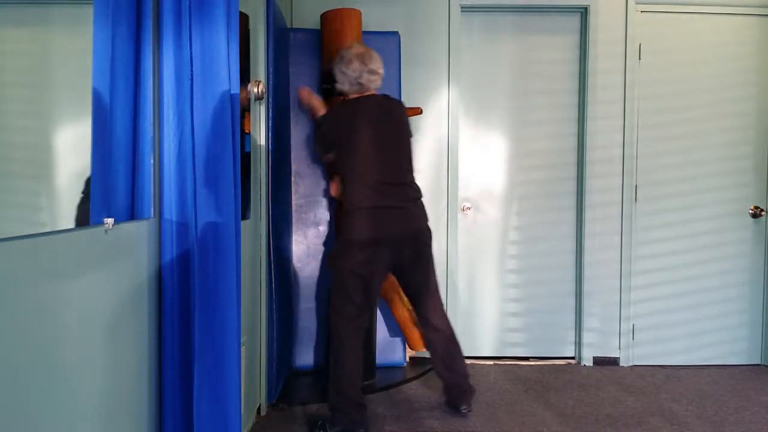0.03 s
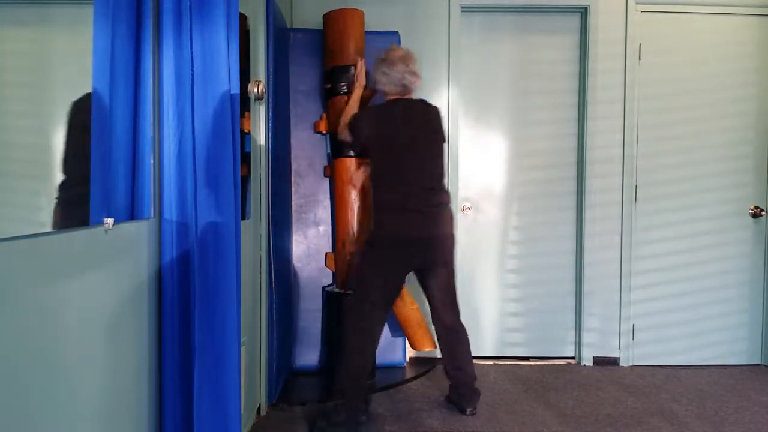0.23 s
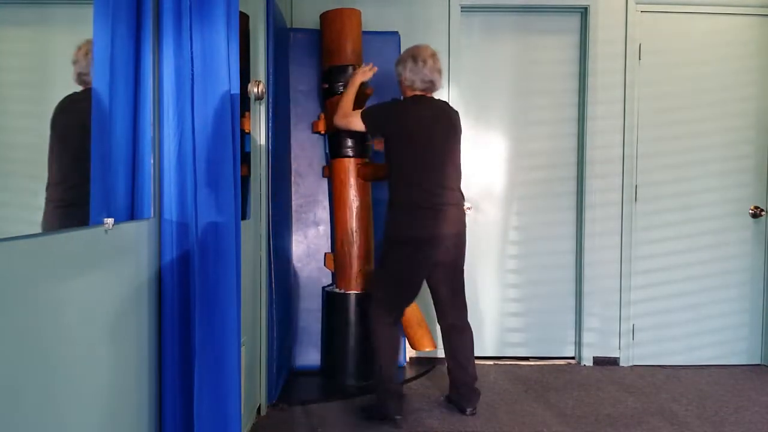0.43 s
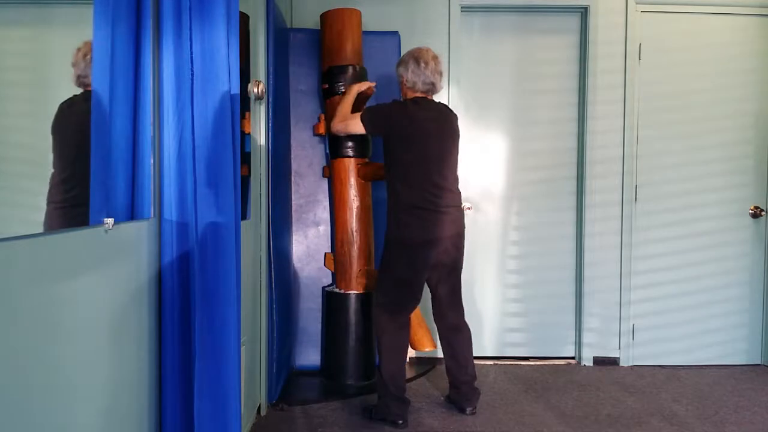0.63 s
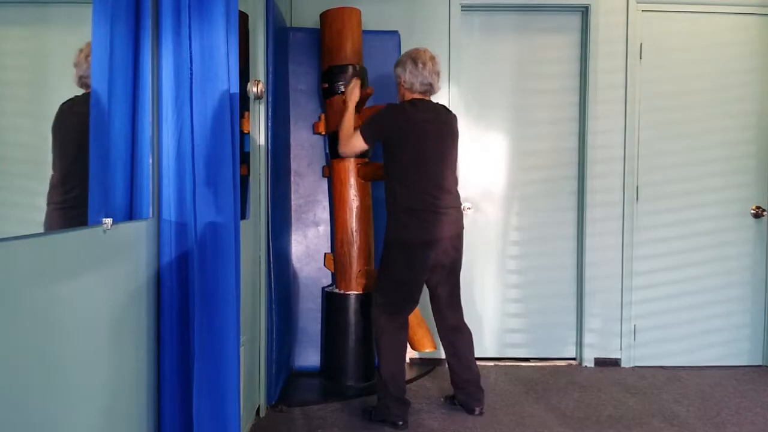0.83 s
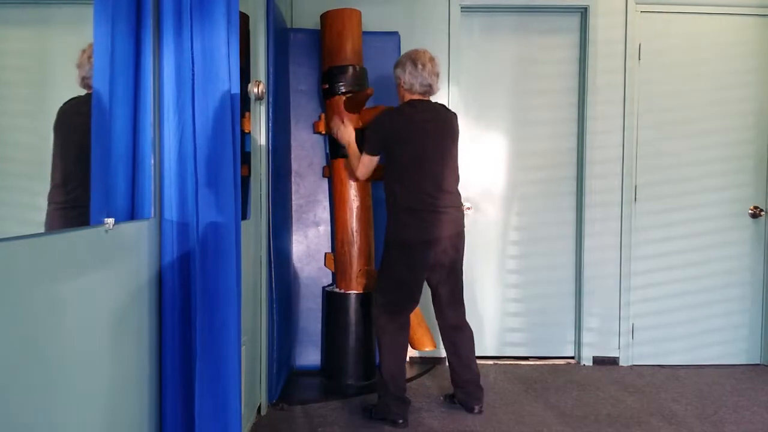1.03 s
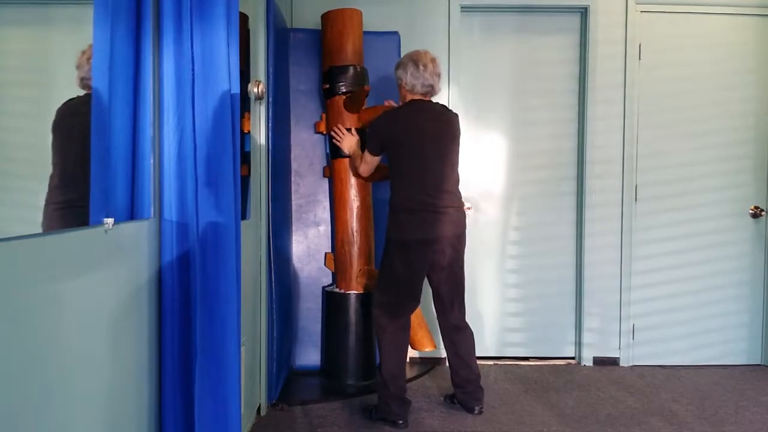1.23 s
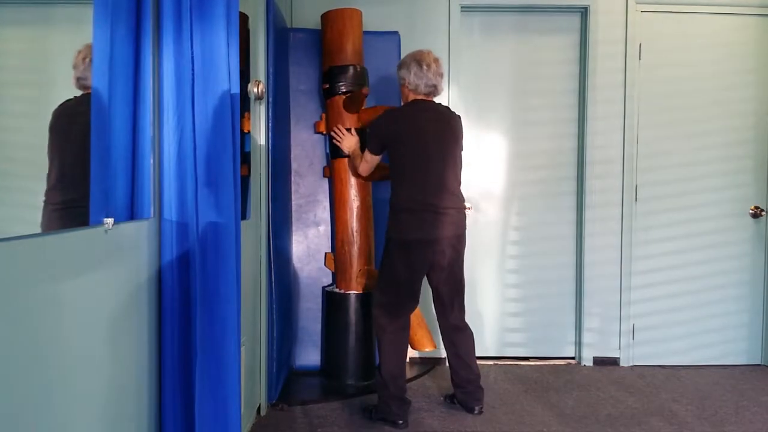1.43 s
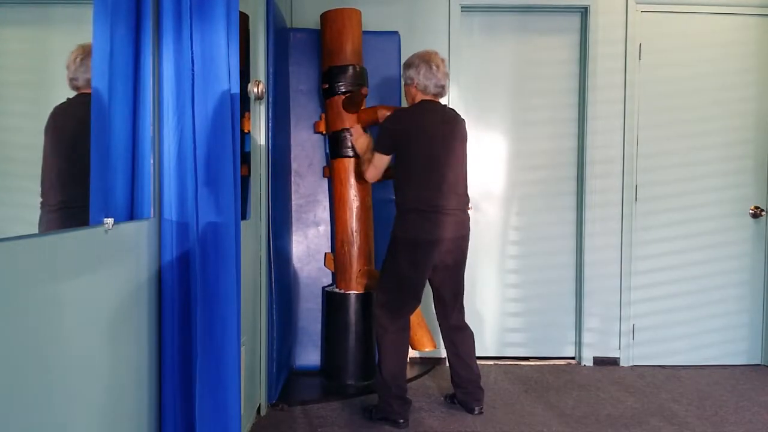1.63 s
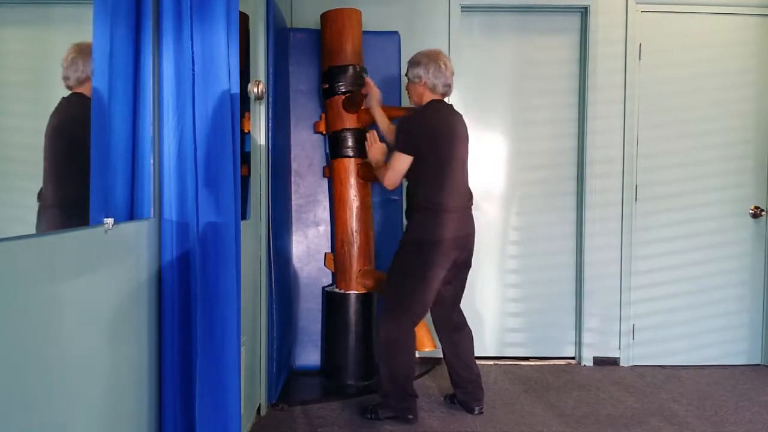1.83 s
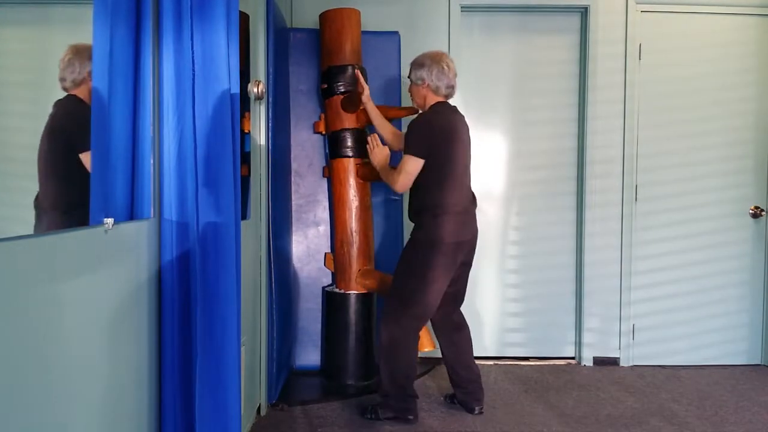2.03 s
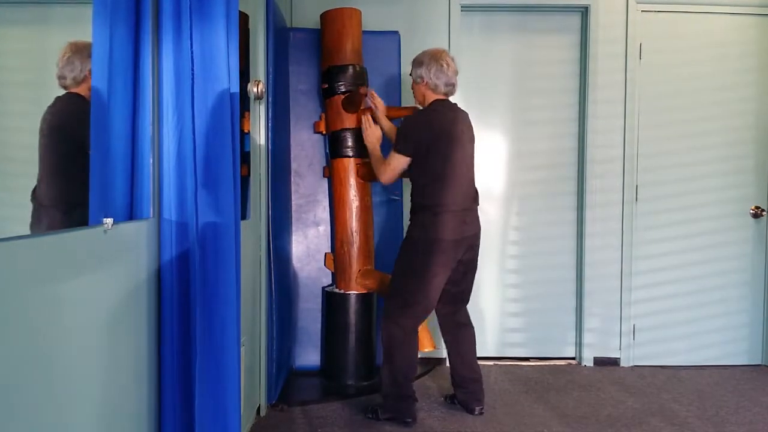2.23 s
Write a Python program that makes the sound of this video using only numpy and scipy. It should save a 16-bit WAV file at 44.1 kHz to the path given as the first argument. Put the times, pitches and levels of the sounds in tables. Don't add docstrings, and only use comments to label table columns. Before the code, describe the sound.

Wooden training dummy struck by bare arms in a reverberant room. Faint low rumble and hiss first; at 0.2 s a slap and rapid woody rattle with a step scuff. At 0.7 s a longer, clackier clatter; at 1.2 s the hardest slap and hollow ringing knocks. Faint cloth drag near 1.8 s, then a lighter slap and knocks at 1.96 s, fading. Distant microphone, muffled left side.

```python
import sys
import numpy as np
from scipy import signal
from scipy.fft import rfft, irfft, next_fast_len
from scipy.io import wavfile
from scipy.ndimage import uniform_filter1d

SR = 44100
rng = np.random.default_rng(int(sys.argv[2]) if len(sys.argv) > 2 else 0)


def digitize_waveform(pressure):
    field = np.atleast_2d(pressure).T
    bounded = np.clip(field, -1, 1)
    quanta = np.round(bounded * 32767).astype(np.int16)
    wavfile.write(sys.argv[1], SR, quanta)


def magnitude_from_level(level_db):
    exponent = np.asarray(level_db, float) / 20
    return 10 ** exponent


N = 101429

# (time [s], level [dB])
RUMBLE_COLOUR = [(15, -32), (25, -47), (48, -15), (115, -11), (288, -21), (359, -15), (494, -23.5),
                 (525, -28.5), (3000, -57), (3900, -93), (6600, -120)]
RUMBLE_SWELL = [(0, 16.5), (.8, 17.5), (1.599, 14.5), (2.3, 13)]
RUMBLE_DB = -65.5
# (frequency [Hz], density [dB per Hz]); then the (left [dB], right [dB]) levels
HISS_COLOUR = [(500, 14), (3000, 6.8), (9000, 0.46), (15000, 7.4)]
HISS_DB = [-67, -63.5]
# (time [s], level [dB], pitch [Hz])
TOUCHES = [
    (.203, -54, 589),
    (.211, -53, 600),
    (.231, -34, 560),
    (.704, -44, 486),
    (0.706, -47.5, 890),
    (.722, -40, 420),
    (1.179, -47.5, 330),
    (1.209, -28.5, 601),
]
TOUCH_PEAK_S = 0.0068
# (time [s], length [s], level [dB])
SHUFFLES = [
    (0.218, 0.059, -40.5),
    (0.373, 0.084, -53.5),
    (0.519, 0.039, -62.5),
    (0.695, 0.092, -43.5),
    (1.761, 0.19, -67.5),
]
# (frequency [Hz], density [dB per Hz])
SHUFFLE_COLOUR = [(300, 23.5), (1000, 8.5), (3000, 12.5), (8000, 3), (15000, -16.5)]
# (time [s], level [dB])
SLAPS = [
    (0.2234, -13.5),
    (0.2277, -19),
    (0.235, -25),
    (0.554, -31),
    (1.179, -8),
    (1.182, -15.5),
    (1.96, -28.5),
    (1.964, -15),
]
# (frequency [Hz], level [dB])
SLAP_COLOUR = [(100, -15), (500, -1.5), (1500, 1), (4000, 0.5), (8000, -4), (12900, -10.5), (16000, -16.5)]
# (time [s], thud level [dB], knock level [dB], bright clack level [dB])
KNOCKS = [
    [(.243, -19, -9.5, -19.5), (.2465, -24.5, -19, -15.5), (.255, -21.5, -23, -19.5),
     (.261, -22.5, -22, -32), (.267, -16, -15, -19), (.276, -32, -25.5, -24), (.292, -24.5, -27, -31),
     (.307, -26.5, -33.5, -24.5), (.44, -49, -31, -40), (.5, -52, -46, -54)],
    [(.731, -28, -21.5, -17.5), (.737, -19, -16, -18.5), (.743, -27.5, -16, -13.5), (.76, -18, -22.5, -22),
     (.785, -16, -21.5, -20.5), (.808, -38, -17.5, -31.5), (.822, -17, -24.5, -42), (.85, -22, -21, -31),
     (.875, -40, -45, -46.5), (.915, -42, -34, -36.5), (1.02, -33, -38.5, -48)],
    [(1.2145, -18, -20.5, -19), (1.225, -21, -11, -13.5), (1.238, -14, -18.5, -44.5)],
    [(1.246, -19.5, -13.5, -16.5), (1.262, -23, -15, -33), (1.28, -24.5, -24, -28),
     (1.3, -29.5, -29, -22.5), (1.342, -20, -36.5, -36.5), (1.396, -27, -25, -31)],
    [(1.965, -25, -23, -35.5), (1.973, -27, -25.5, -30), (1.998, -31.5, -40, -31)],
    [(2.004, -24, -20.5, -35.5), (2.02, -23.5, -22.5, -30), (2.029, -32.5, -27, -25.5),
     (2.075, -40, -34, -45), (2.105, -37.5, -37.5, -43), (2.2, -58, -40, -45.5)],
]
# (frequency [Hz], width [Hz], level [dB])
ARM_1_MODES = [(285, 26, -2.5), (546.3, 54, 5), (610, 46, -6), (820, 70, -6), (1486, 98, -11.5),
               (2057, 35, -16), (2290, 37, -27), (2540, 40, -45), (3420, 70, -32), (5380, 60, -23.5),
               (7400, 380, -42.5)]
ARM_2_MODES = [(263, 31, -12), (372, 160, -10), (833, 60, -6), (1100, 75, -21.5), (1781, 22, 4.5),
               (2405, 50, -22), (2578, 120, -16), (3670, 150, -22), (4414, 150, -19.5), (4960, 80, -22),
               (5690, 71, -8), (6120, 52, -11), (7500, 1300, -30.5)]
ARM_3_MODES = [(262, 41, -12), (440, 91, -3), (790, 85, 1.5), (1060, 41, -6), (1770, 52, 4.5),
               (2522, 44, -5.5), (3380, 90, -19), (4720, 80, -22.5), (5300, 90, -11), (5690, 250, -9),
               (6110, 68, -13.5)]
ARM_3_LATE_MODES = [(273, 30, -22), (420, 100, -5.5), (560, 70, 1), (814, 55, -5), (1090, 44, -7.5),
                    (1533, 38, 5.5), (1620, 50, 0.5), (2313, 100, -11), (2860, 74, -21), (3700, 61, -18.5),
                    (4310, 70, -19), (5460, 80, -10.5), (5550, 55, -16), (5980, 110, -15.5)]
ARM_4_EARLY_MODES = [(248, 24, -15), (455, 70, 4.5), (833, 69, -8), (1590, 95, 3), (2055, 120, -13.5),
                     (2390, 73, -9.5), (3380, 260, -22), (5300, 110, -18)]
ARM_4_MODES = [(274, 41, -15), (411, 46, 6.5), (560, 50, -2), (793, 57, -2), (1566, 23, 3),
               (1610, 20, -9.5), (2035, 100, -24), (2370, 73, -19), (3480, 570, -32.5), (5330, 68, -24.5)]
# (frequency [Hz], density [dB per Hz])
CRACK_1 = [(60, -31), (200, -39), (400, 4.5), (750, 17), (1300, -1), (2500, -36), (6000, -60), (16000, -79)]
CRACK_2 = [(60, -37.5), (200, 8.5), (900, 9.5), (1350, -8), (2500, -12.5), (6200, -13.5), (7000, -41),
           (16000, -21.5)]
CRACK_3 = [(60, -14.5), (200, -4.5), (900, 17), (1300, -10), (2500, -2), (6200, 3), (7000, -33.5),
           (16000, -47.5)]
CRACK_4 = [(60, -24.5), (200, 4), (800, 15), (1250, -4), (2500, -27.5), (6000, -31), (9000, -25.5),
           (16000, -54)]
CRACK_DB = [12, 17.7, 10.3, 9, 13.7, 10.6]
CRACK_DECAY_S, STRIKE_SPREAD_DB = 0.0023, 3
NARROWEST_HZ, HIGHEST_Q = 20, 80
THUD_TOP_HZ, CLACK_FROM_HZ, KNOCK_TOP_HZ = 380, 1250, 10000
# (frequency [Hz], level [dB])
KNOCK_COLOUR = [(540, 0.5), (680, -5.5), (790, 0.5), (1100, -1.5), (1400, 0.5)]
# (frequency [Hz], t60 [s])
ROOM_T60 = [(60, 0.18), (150, 1), (300, 0.68), (600, 0.46), (850, 0.41), (1500, 0.36), (4000, 0.4),
            (8000, 0.26), (14000, 0.43)]
# (frequency [Hz], likeness [0 to 1])
LIKENESS = [(90, 1.05), (180, 0.79), (550, 1), (1650, 0.31), (4970, 0.063), (15000, 0.02)]
DIRECT_DB, ROOM_DB, BUILD_S, SOURCE_LOW_HZ = 1, -25, 0.0008, 163
EARLY_DB, EARLY_S, EARLY_TOP_HZ = 13, 0.016, 1200
EVEN_HZ = 43.1
# (frequency [Hz], level [dB])
LEFT_PORT = [(60, -2.5), (250, -2.5), (600, -7.5), (1100, -15), (2500, -18), (5000, -20), (7000, -41.5),
             (15000, -50.5)]
PEAK_LIMIT, RECORDER_TOP_HZ = 1.1, 15900


def at_hz(points, hz):
    table = np.array(points)
    return np.interp(np.log(hz + 1), np.log(table[:, 0]), table[:, 1])


def rms_one(x):
    return x / np.sqrt(np.mean(x ** 2) + 1e-20)


def min_phase(x, db):
    size = 2 * len(db) - 2
    cepstrum = irfft(np.log(magnitude_from_level(db)), size)
    cepstrum[1:size // 2] *= 2
    cepstrum[size // 2 + 1:] = 0
    return irfft(rfft(x, size) * np.exp(rfft(cepstrum)), size)[..., :x.shape[-1]]


def colour(x, points):
    half = next_fast_len(x.shape[-1])
    hz = np.arange(half + 1) * SR / 2 / half
    return min_phase(x, at_hz(points, hz))


def pair(length, t60=None):
    out, t = 0, np.arange(length) / SR
    edges = 22 * 2 ** np.arange(0, 10, .5)
    white = rng.standard_normal((2, 2, length))
    for k, (low, high) in enumerate(zip(edges, edges[1:])):
        band = signal.butter(2, [low, high], "band", fs=SR, output="sos")
        mid, side = signal.sosfilt(band, white[k % 2])
        hz = np.sqrt(low * high)
        alike = np.clip(at_hz(LIKENESS, hz), 0, 1)
        fade = 1 if t60 is None else magnitude_from_level(-60 * t / at_hz(t60, hz))
        out = out + fade * (np.sqrt(1 + alike) * mid + np.sqrt(1 - alike) * side * [[1], [-1]])
    return out


def add(track, s, sound):
    i = int(s * SR)
    track[i:i + len(sound)] += sound[:len(track) - i]


def room_tone():
    s, db = np.transpose(RUMBLE_SWELL)
    level_db = RUMBLE_DB + np.interp(np.arange(N) / SR, s, db)
    rumble = colour(pair(N + SR), RUMBLE_COLOUR + [(6000, -74)])[:, SR:]
    return magnitude_from_level(level_db) * rms_one(rumble)


def preamp_hiss():
    hiss = rms_one(colour(rng.standard_normal((2, N)), HISS_COLOUR))
    return magnitude_from_level(np.array(HISS_DB))[:, None] * hiss


def touches():
    out, t = np.zeros(N), np.arange(2048) / SR
    bump = (t / TOUCH_PEAK_S) * np.exp(1 - t / TOUCH_PEAK_S)
    for s, db, hz in TOUCHES:
        add(out, s, magnitude_from_level(db) * bump * np.sin(2 * np.pi * hz * t))
    return out


def shuffles():
    t = np.arange(N) / SR
    swell = np.zeros(N)
    for s, length, db in SHUFFLES:
        swell += magnitude_from_level(db) * np.sin(np.pi * np.clip((t - s) / length, 0, 1))
    grain = rng.standard_normal(N) * magnitude_from_level(0.63 * rng.standard_normal(N))
    return swell * rms_one(colour(grain, SHUFFLE_COLOUR))


def crack(points):
    splinter = .15 * rng.standard_normal(4096) * np.exp(-np.arange(4096) / SR / CRACK_DECAY_S)
    splinter[0] = .7
    return colour(splinter, points)


def slaps():
    out = np.zeros(N)
    for s, db in SLAPS:
        add(out, s, magnitude_from_level(db) * crack(SLAP_COLOUR))
    return out


def knock(modes, crack_points, crack_db):
    t = np.arange(8192) / SR
    hz, width, db = np.transpose(modes)[:, :, None]
    width = np.maximum(width, np.maximum(NARROWEST_HZ, hz / HIGHEST_Q))
    gains = magnitude_from_level(db + STRIKE_SPREAD_DB * rng.standard_normal(hz.shape)) * width / 150
    body = np.sum(gains * np.exp(-np.pi * width * t) * np.sin(2 * np.pi * hz * t), axis=0)
    body[:4096] += magnitude_from_level(crack_db) * crack(crack_points)
    return body


def dummy():
    out = np.zeros(N)
    thud_band = signal.butter(2, THUD_TOP_HZ, "low", fs=SR, output="sos")
    knock_band = signal.butter(2, [THUD_TOP_HZ, CLACK_FROM_HZ], "band", fs=SR, output="sos")
    clack_band = signal.butter(2, CLACK_FROM_HZ, "high", fs=SR, output="sos")
    arms = (ARM_1_MODES, ARM_2_MODES, ARM_3_MODES, ARM_3_LATE_MODES, ARM_4_EARLY_MODES, ARM_4_MODES)
    cracks = (CRACK_1, CRACK_2, CRACK_3, CRACK_3, CRACK_4, CRACK_4)
    for contacts, modes, points, crack_db in zip(KNOCKS, arms, cracks, CRACK_DB):
        for s, thud_db, knock_db, clack_db in contacts:
            body = knock(modes, points, crack_db)
            thud = magnitude_from_level(thud_db) * signal.sosfilt(thud_band, body)
            middle = magnitude_from_level(knock_db) * signal.sosfilt(knock_band, body)
            clack = magnitude_from_level(clack_db + 9.5) * signal.sosfilt(clack_band, body)
            add(out, s, thud + middle + clack)
    knock_top = signal.butter(5, KNOCK_TOP_HZ, fs=SR, output="sos")
    return signal.sosfilt(knock_top, colour(out, KNOCK_COLOUR))


def room_answer():
    t = np.arange(SR) / SR
    tail = pair(SR, ROOM_T60) * (1 - np.exp(-t / BUILD_S))
    dull = signal.sosfilt(signal.butter(2, EARLY_TOP_HZ, fs=SR, output="sos"), tail)
    tail = tail + magnitude_from_level(EARLY_DB) * np.exp(-t / EARLY_S) * dull
    tail[:, 0] = magnitude_from_level(DIRECT_DB - ROOM_DB)
    power = np.abs(rfft(tail[1], 2 * SR)) ** 2 + 1e-9
    fine = uniform_filter1d(power, size=int(2 * EVEN_HZ))
    broad = uniform_filter1d(power, size=1000)
    return magnitude_from_level(ROOM_DB) * min_phase(tail, -10 * np.log10(fine / broad))


def room(x, answer):
    x = signal.sosfilt(signal.butter(2, SOURCE_LOW_HZ, "high", fs=SR, output="sos"), x)
    return signal.fftconvolve(x[None], answer)[:, :N]


def scene():
    answer = room_answer()
    rumble = room_tone()
    blows = touches() + shuffles() + slaps() + dummy()
    return room(blows, answer) + rumble


def roll_off(x):
    return signal.sosfilt(signal.butter(12, 16460, fs=SR, output="sos"), x)


def record(dry):
    x = np.array([colour(dry[0], LEFT_PORT), dry[1]])
    x = x + preamp_hiss()
    rounded = PEAK_LIMIT * np.tanh(x / PEAK_LIMIT)
    top_cut = signal.cheby2(12, 40, RECORDER_TOP_HZ, fs=SR, output="sos")
    mix = signal.sosfilt(top_cut, rounded)
    return roll_off(mix)


dry = scene()
out = record(dry)
digitize_waveform(out)
```